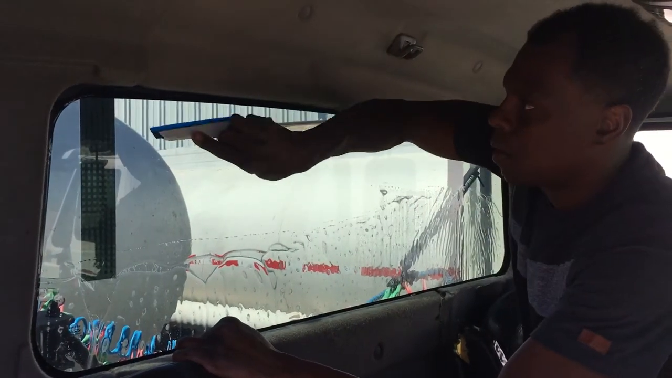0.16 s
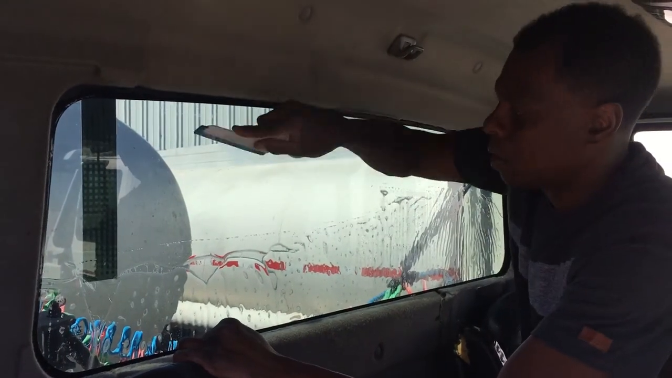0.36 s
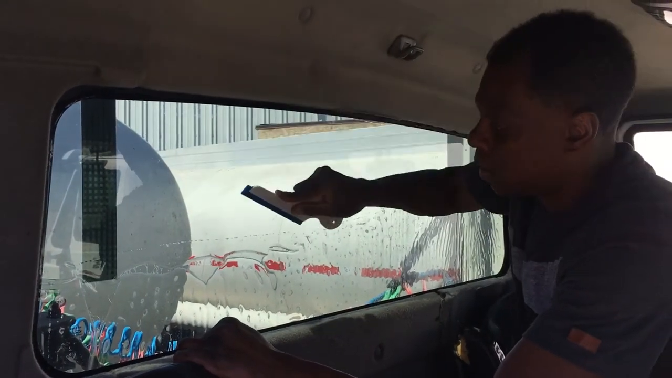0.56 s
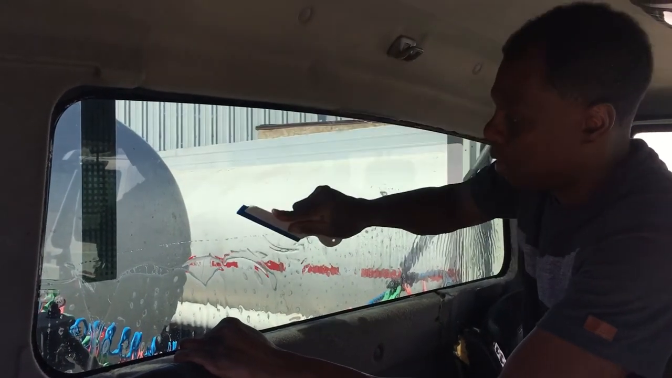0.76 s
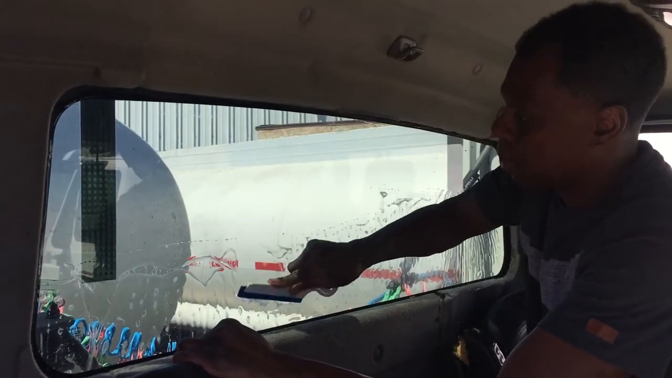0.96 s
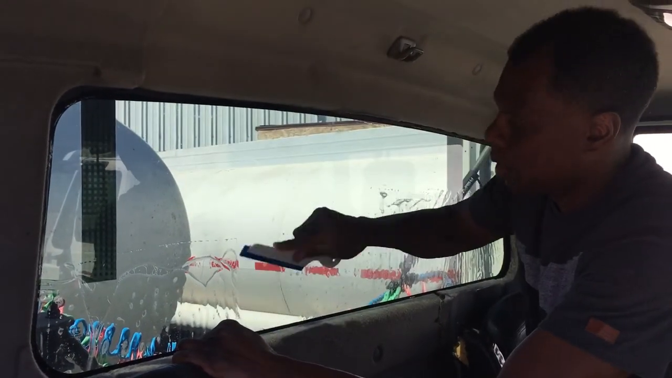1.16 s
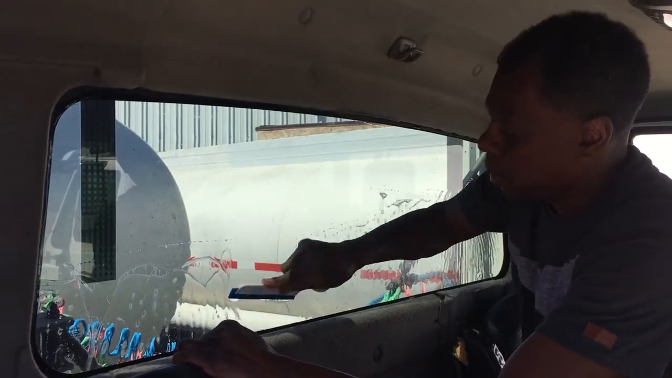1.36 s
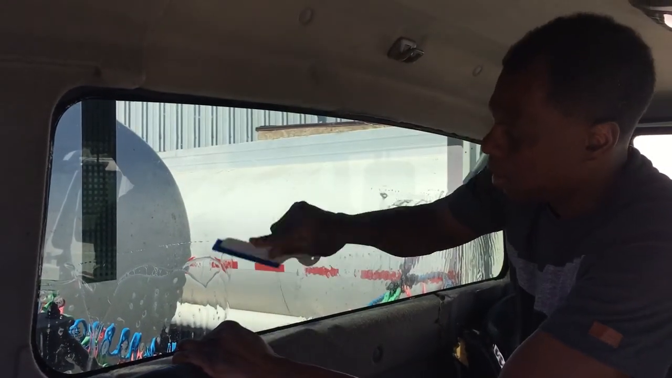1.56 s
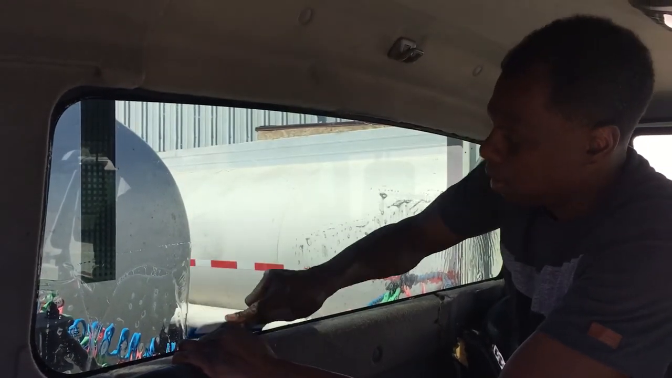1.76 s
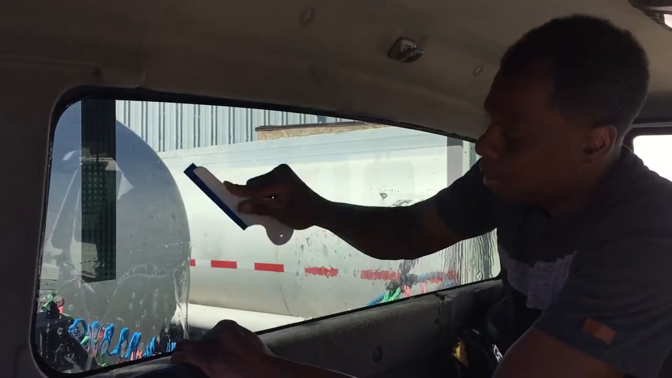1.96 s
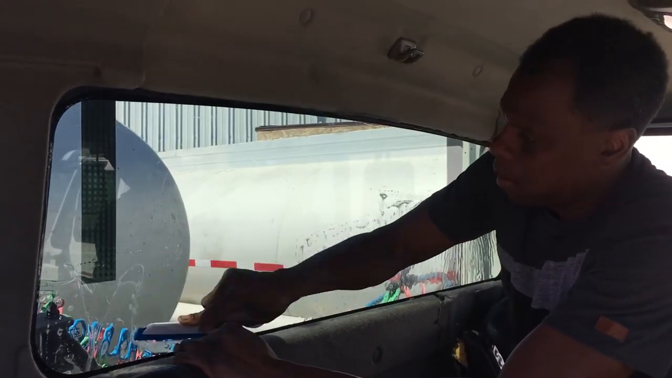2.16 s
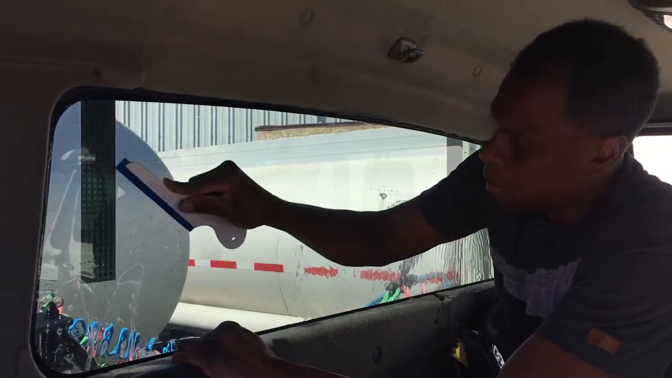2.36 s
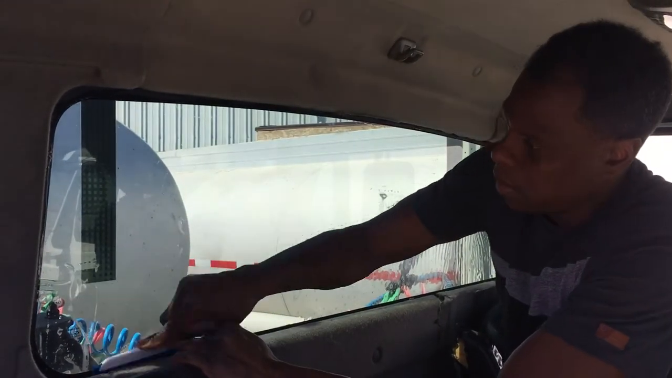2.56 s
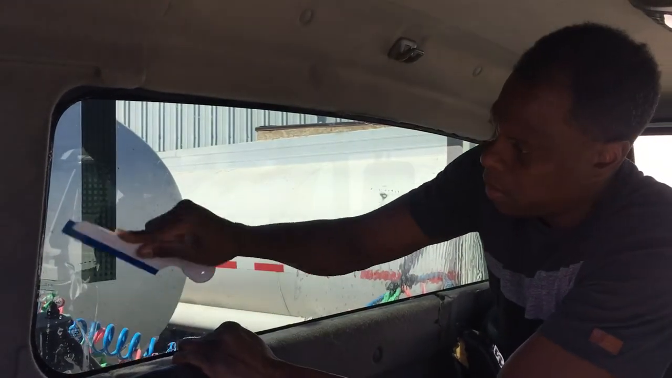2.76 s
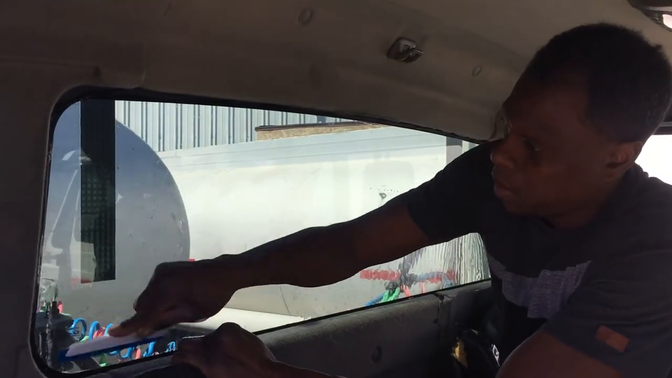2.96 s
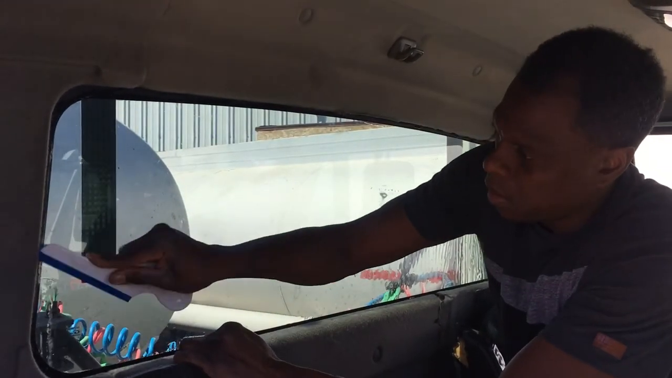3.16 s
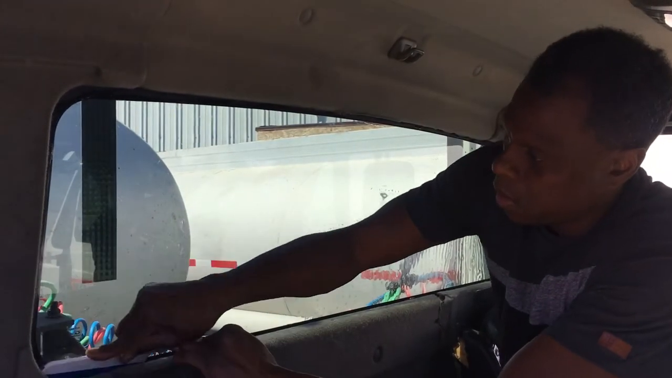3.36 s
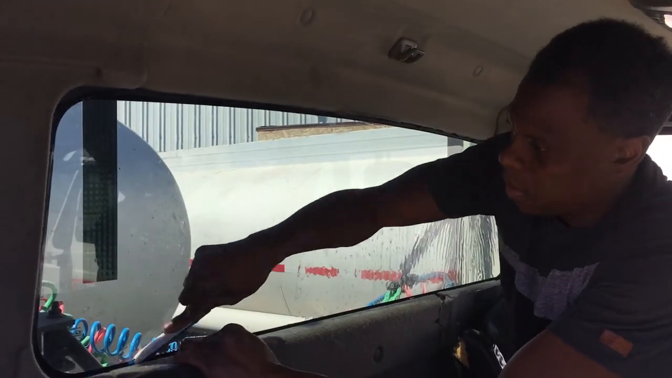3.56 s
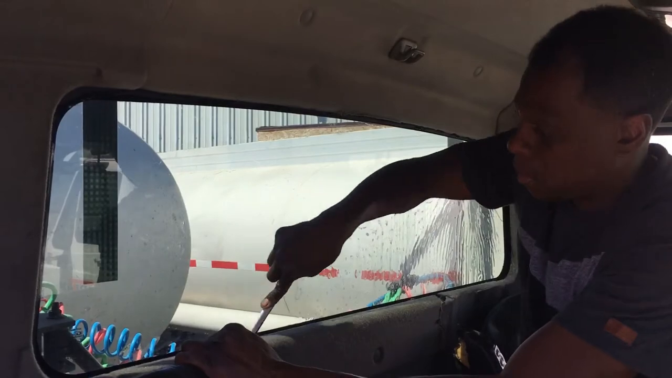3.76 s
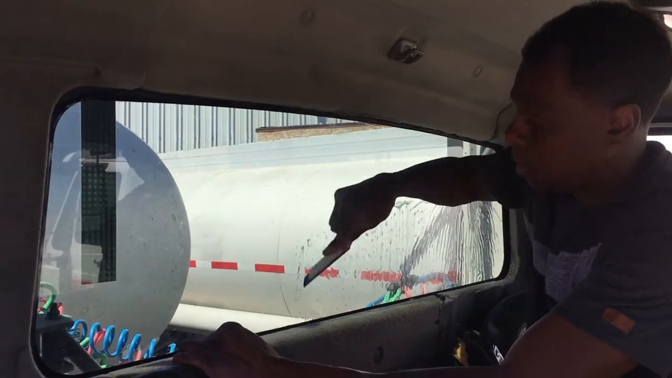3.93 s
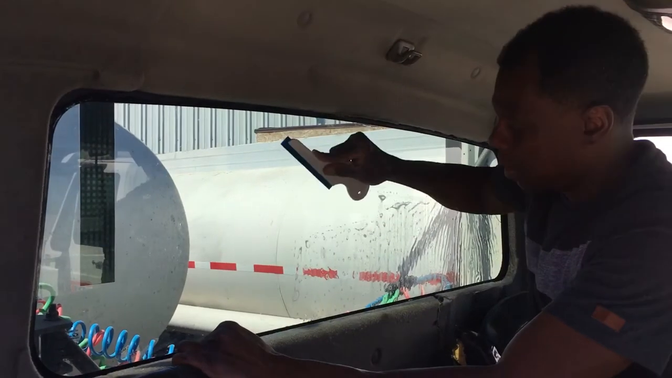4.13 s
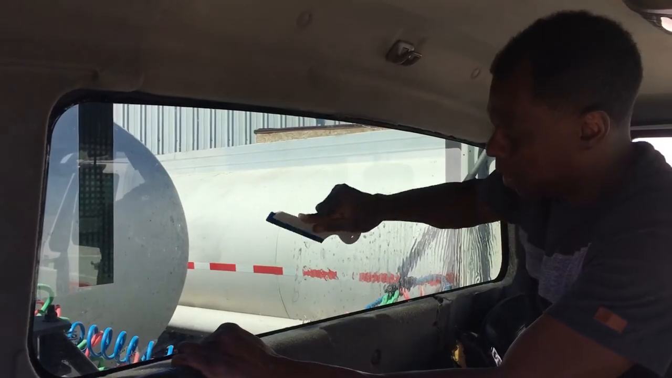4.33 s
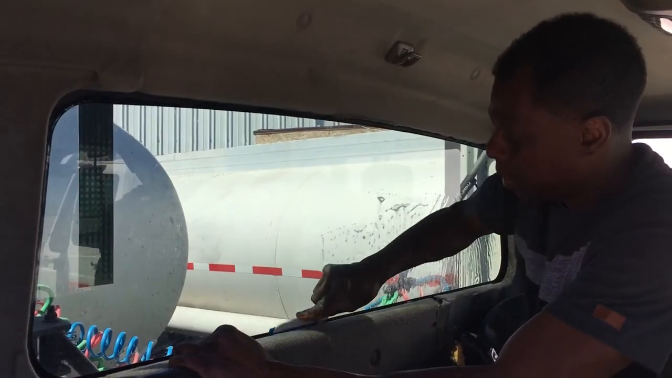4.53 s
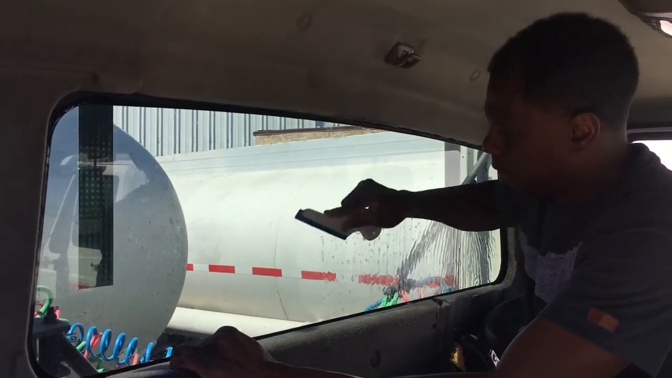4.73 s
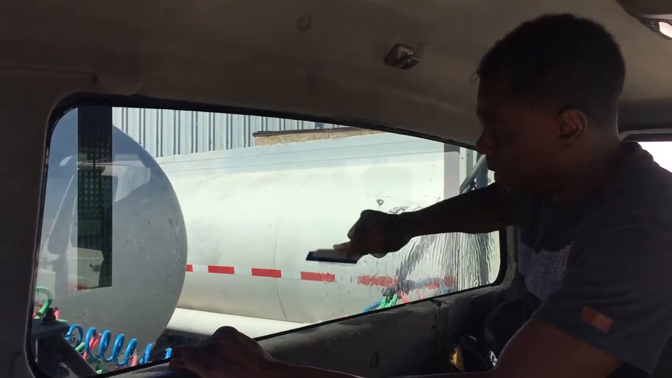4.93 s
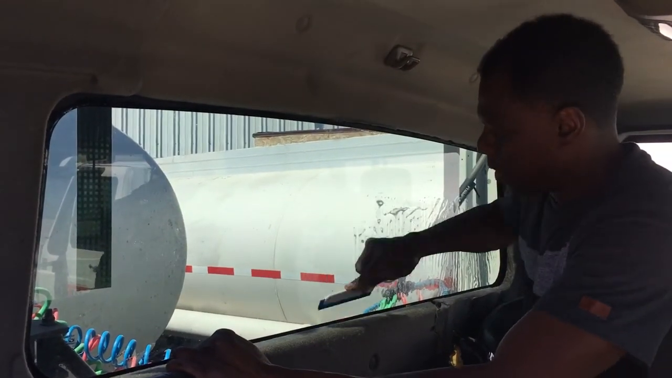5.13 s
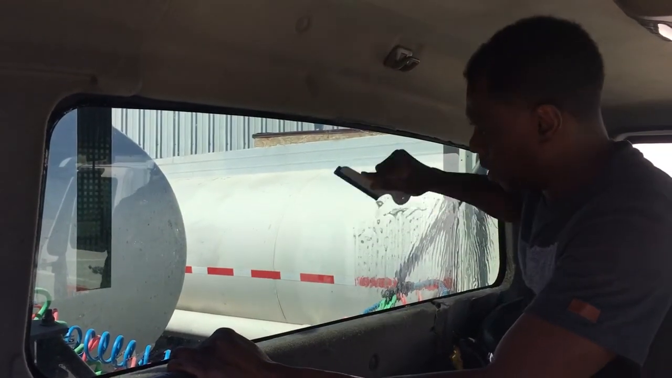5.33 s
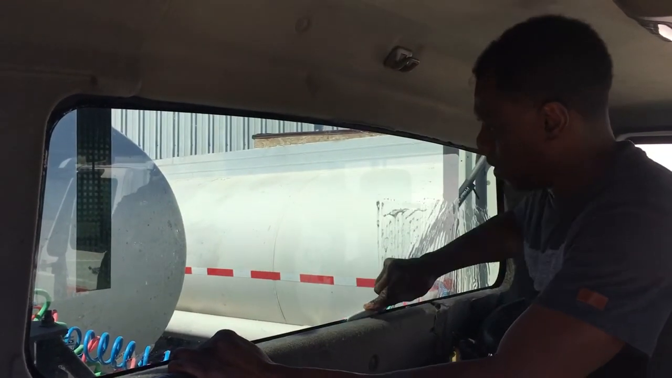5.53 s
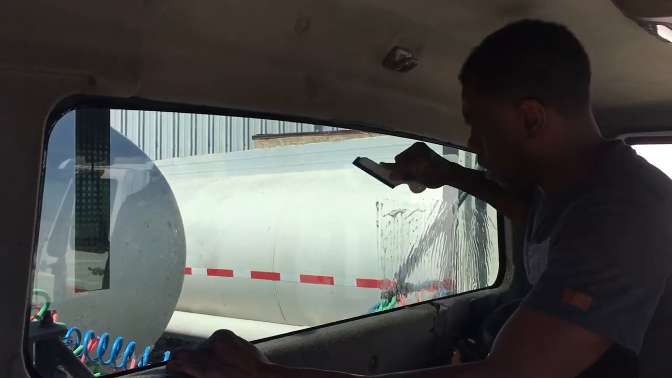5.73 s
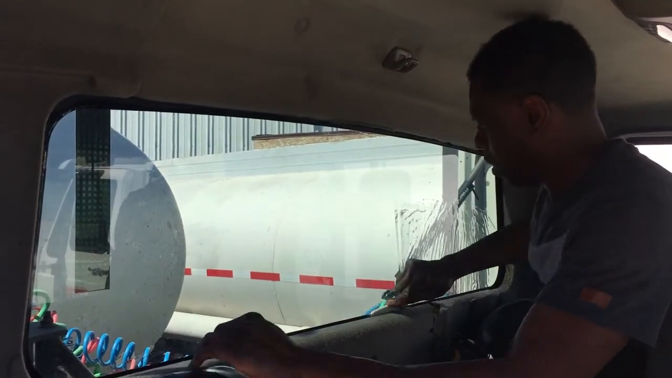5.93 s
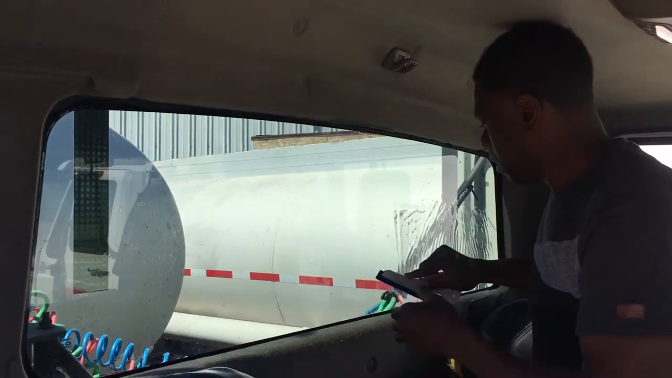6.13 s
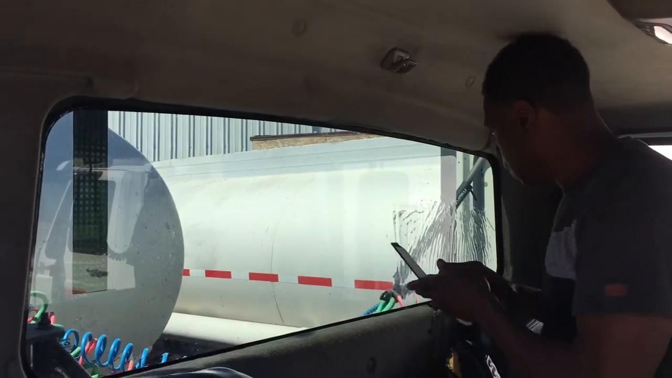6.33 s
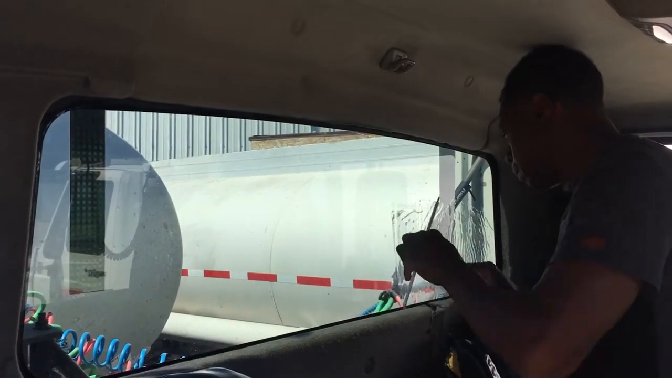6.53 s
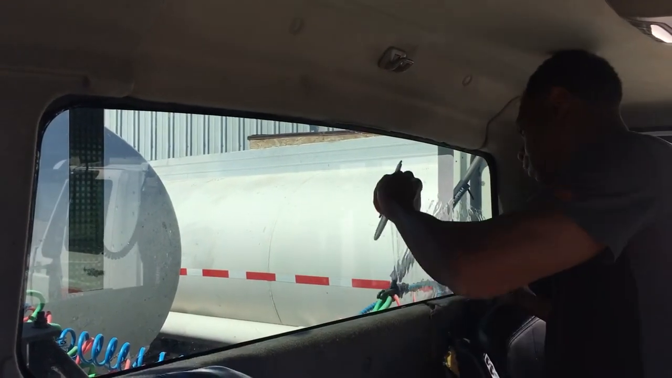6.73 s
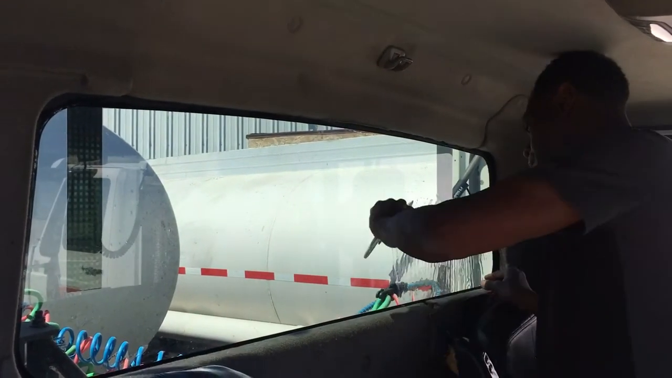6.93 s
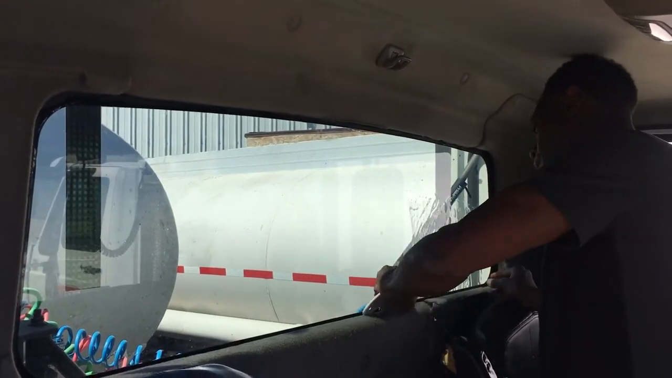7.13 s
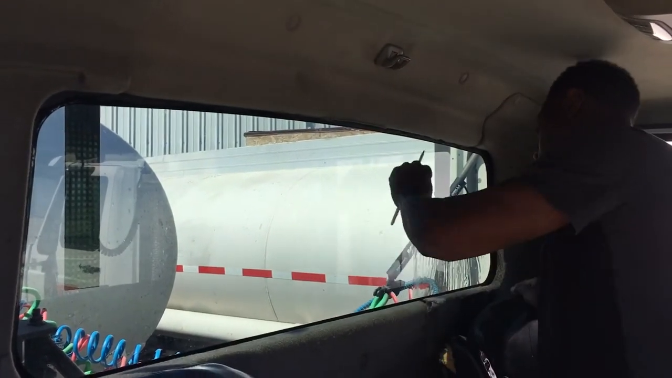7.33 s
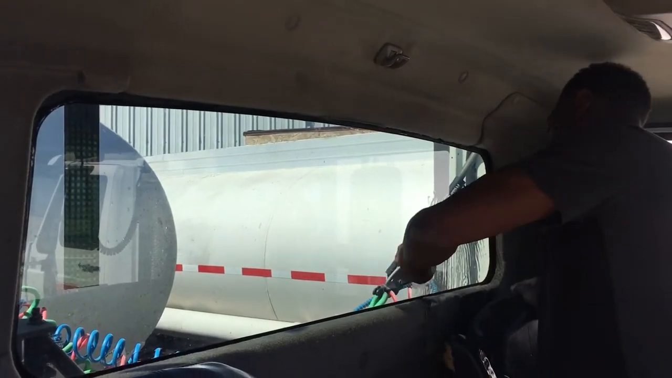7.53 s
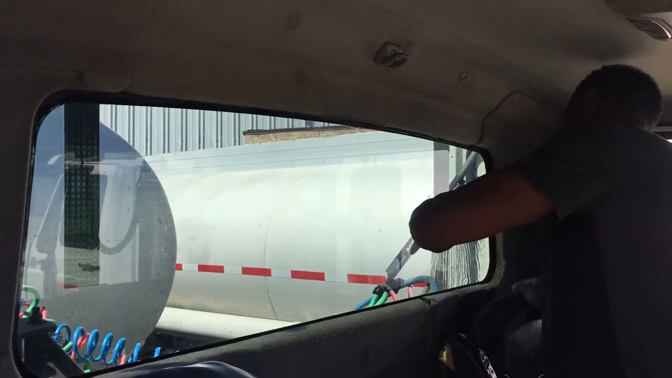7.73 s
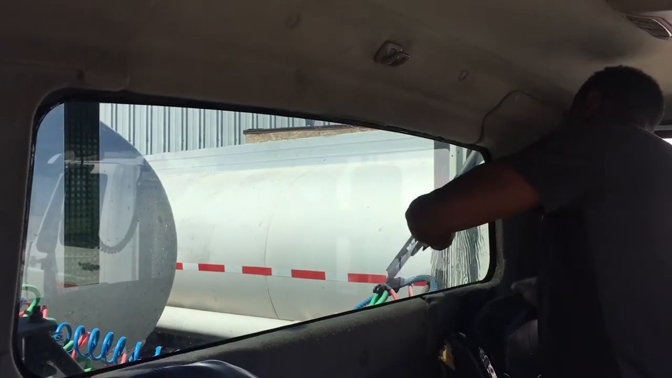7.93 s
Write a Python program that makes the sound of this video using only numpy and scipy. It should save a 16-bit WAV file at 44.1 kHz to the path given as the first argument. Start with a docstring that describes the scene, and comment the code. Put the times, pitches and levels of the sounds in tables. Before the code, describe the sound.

A hand squeegee works wet glass inside a vehicle cab: short hissing wipes, rubbery scrapes, dull knocks and one sharp plastic click over low rumble.

```python
"""Wet rubber hisses and squeaks across glass over low door rumble and a steady wash from the yard outside.
A hand squeegee works the side window of a truck cab: strokes are filtered grain noise with bubble pops.
Landings slap the pane and bumps hit the frame: noise bursts plus dying modes of handle, frame, pane and door.
The lip smacks off the film as short noise bursts; once the plastic handle snaps hard on the frame, a modal click."""
import sys
import numpy as np
from scipy import signal
from scipy.io import wavfile
from scipy.ndimage import uniform_filter1d

SR = 44100
rng = np.random.default_rng(int(sys.argv[2]) if len(sys.argv) > 2 else 0)


def digitize_waveform(pressure):
    """Quantize a signal to 16-bit integers and store it at the path in sys.argv[1].

    Rows of a 2-D input are taken as channels; values are limited to [-1, 1].
    """
    field = np.atleast_2d(pressure).T
    bounded = np.clip(field, -1, 1)
    quanta = np.round(bounded * 32767).astype(np.int16)
    wavfile.write(sys.argv[1], SR, quanta)


N = 352403
AGE = np.arange(SR * 2 // 5) / SR  # s since the onset of an event
USUAL_DB = -43  # blow or lean of usual force

# modes of the pane: freq_hz, level_db, t60_s
PANE_MODES = [(157, 0.5, 0.55), (196.2, 1, 0.48), (217.8, -1, 0.48), (238.1, -1, 0.51), (272.6, 0, 0.3),
              (322.8, -7, 0.56), (385, -7, 0.23)]
# modes of the window frame: freq_hz, level_db, t60_s
FRAME_MODES = [(375.5, -1.5, 0.33), (505.6, -6, 0.22), (574.3, -1.5, 0.15), (656, -0.5, .12),
               (718, -8.5, 0.2), (824, -15.5, 0.41), (1008, -4, 0.13)]
# spectrum of frame knock and judder: freq_hz, density_db_per_hz
KNOCK_SPECTRUM = [(260, -17), (330, 4), (390, 6), (450, 3.5), (585, -3), (660, -3.5), (770, -3.5),
                  (930, -2.5), (1300, -17)]
# spectrum of handle clack and rubber drag: freq_hz, density_db_per_hz
CLACK_SPECTRUM = [(600, -21.5), (900, -3), (1070, 1.5), (1350, 0), (1550, -1.5), (1800, -2), (2200, -3.5),
                  (2600, -10), (3600, -23), (6000, -21)]
# spectrum of film hiss: freq_hz, density_db_per_hz
HISS_SPECTRUM = [(1900, -21), (2800, -4.5), (3700, 2.5), (4600, 1), (5200, -3), (6100, -1), (7000, -0.5),
                 (8500, -57)]
# spectrum of fine spray: freq_hz, density_db_per_hz
SPRAY_SPECTRUM = [(5500, 1), (7200, -6.5), (8300, -0.5), (9700, -2), (10800, -12.5), (12000, -2.5),
                  (14000, -12), (16000, -12)]


def amp(db):
    """Decibels to gain."""
    return 10 ** (np.asarray(db) / 20)


def evened(x, span_s=None):
    """Scales to rms 1, over the first span_s if given."""
    head = x if span_s is None else x[:int(span_s * SR)]
    return x / np.sqrt(np.mean(head ** 2) + 1e-20)


def steadied(x, span_s):
    """Holds a noise near rms 1 from moment to moment."""
    power = abs(uniform_filter1d(x ** 2, max(int(span_s * SR), 2)))
    return x / np.sqrt(power + 1e-12)


def add(mix, start_s, sound):
    """Mixes a sound in at start_s."""
    part = mix[max(round(start_s * SR), 0):][:len(sound)]
    part += sound[:len(part)]


def colour(x, spectrum, size=4096):
    """Minimum-phase filter, log-frequency interpolation between spectrum points."""
    hz, db = np.transpose(spectrum)
    f = abs(np.fft.fftfreq(size, 1 / SR))
    gain_db = np.interp(np.log(f + 1), np.log(hz), db, left=min(db[0], -20), right=-65)
    log_gain = np.log(amp(gain_db))
    taps = np.fft.ifft(np.exp(np.conj(signal.hilbert(log_gain)))).real
    return signal.fftconvolve(x, taps[:size // 2])[:len(x)]


def grains(count, per_s, spread_db):
    """Random train of tiny clicks of unequal size, rms 1."""
    size_db = spread_db * np.minimum(rng.exponential(1, count), 4)
    struck = rng.random(count) < per_s / SR
    return evened(rng.standard_normal(count) * amp(size_db) * struck)


def wander(hz):
    """Random drift of rms 1, low-passed at hz."""
    lowpass = signal.butter(2, hz, fs=SR, output="sos")
    return evened(signal.sosfilt(lowpass, rng.standard_normal(N)))


def swell(rise_s):
    """Opens from 0 towards 1, 63% at rise_s."""
    return 1 - np.exp(-(AGE / max(rise_s, 1e-5)) ** 2)


def ring(modes, scatter_db, detune):
    """Dying modes; share, pitch and phase vary at random from blow to blow."""
    hz, db, t60_s = np.transpose(modes)[:, :, None]
    share, shift, phase = rng.standard_normal((3, len(modes), 1))
    envelope = amp(db + scatter_db * share - 60 * AGE / t60_s)
    cycles = hz * (1 + detune * shift) * AGE + phase
    return (envelope * np.sin(2 * np.pi * cycles)).sum(0)


def echo(t60_s):
    """Dense reflections in the cab: the trim soaks up treble first; t60_s holds at 1 kHz."""
    hz, t, z = signal.stft(rng.standard_normal(len(AGE)), SR, nperseg=256)
    band_t60_s = t60_s * (np.maximum(hz, 400)[:, None] / 1000) ** -.4
    return signal.istft(z * amp(-60 * t / band_t60_s), SR, nperseg=256)[1][:len(AGE)]


def burst(spectrum, rise_s, t60_s, tail_db, tail_t60_s):
    """Cluster of tiny contacts with the short echo of the cab."""
    contact = steadied(grains(len(AGE), 12000, 8.9), 0.0044) * amp(-60 * AGE / t60_s)
    return colour((contact + amp(tail_db) * echo(tail_t60_s)) * swell(rise_s), spectrum)


def rumble(count):
    """The door shuddering under the hand: low noise held near rms 1."""
    # freq_hz, density_db_per_hz
    door_spectrum = [(12, -22.5), (27, -1.5), (40, 0.5), (55, 3), (70, 1), (83, 5), (105, 0), (135, -8),
                     (200, -29.5)]
    return steadied(colour(rng.standard_normal(count), door_spectrum, size=32768), 0.17)


def cab():
    """Door and pane rumble as the hand leans on them, over the wash of the yard outside."""
    # hand leaning on the window: time_s, level_db
    lean_points = [(0.0, -43.5), (0.93, -38), (1.27, -38.5), (1.44, -40), (1.76, -43), (2.02, -34.5),
                   (2.74, -38), (3.29, -38), (4.94, -45.5), (5.21, -42.5), (5.74, -41), (6.25, -52),
                   (7.14, -46), (7.32, -34), (7.54, -45.5), (7.99, -42.5)]
    # drone of the pane: freq_hz, density_db_per_hz
    drone_spectrum = [(90, -16), (140, 1.5), (175, 0.5), (210, 1.5), (270, -2.5), (330, -5), (420, -13),
                      (600, -18), (900, -18), (1500, -27)]
    # wash of the yard: freq_hz, density_db_per_hz
    yard_spectrum = [(120, -35.5), (200, -3.5), (254, -4), (473, -28.5), (647, -15), (683, -19),
                     (883, -23.5), (950, -21), (1370, -21), (1500, -19), (2170, -26), (2510, -32.5),
                     (6400, -40), (14300, -44.5), (16000, -49)]
    lean_gain_db = 2  # overall strength of the lean on the door
    waver_db, waver_hz = 1.5, 15.7  # unsteadiness of the hand
    drone_db, drone_slope = -49.5, 0.31  # at usual lean; dB per dB of lean
    yard_db = -58
    lean_db = np.interp(np.arange(N) / SR, *np.transpose(lean_points))
    door = rumble(N) * amp(lean_db + lean_gain_db + waver_db * wander(waver_hz))
    drone = steadied(colour(rng.standard_normal(N), drone_spectrum), 0.16)
    pane = drone * amp(drone_db + drone_slope * (lean_db - USUAL_DB))
    wash = evened(colour(rng.standard_normal(N), yard_spectrum))
    return door + pane + amp(yard_db + 0.33 * wander(3.6)) * wash


def bubbles():
    """Tiny soap bubbles bursting at the lip, each a few cycles at its own pitch."""
    pops = np.zeros(N)
    age_s = AGE[:SR // 200]
    when, pitch, size = rng.random(size=(5000, 3)).T[:, :, None]
    cycles = 2800 * 4 ** pitch * age_s  # 2.8-11.2 kHz
    pop = amp(14 * size ** 2) * np.sin(2 * np.pi * cycles) * np.exp(-cycles / 6)
    start = (when * (N - len(age_s))).astype(int)
    np.add.at(pops, start + np.arange(len(age_s)), pop)
    return evened(pops)


def wipes():
    """Soapy water fizzes out from under the sliding blade while the rubber drags on the film."""
    # strokes: fastest_s, speeding_up_s, slowing_down_s, hiss_db, film_dryness (0-1)
    strokes = [(0.005, 0.043, 0.065, -52.5, 0.54), (0.233, 0.045, 0.055, -72, 1),
               (.58, 0.067, 0.072, -70, 1), (1.03, 0.1, 0.11, -57.5, 0), (1.392, 0.085, 0.097, -57.5, 0.23),
               (1.79, 0.064, 0.11, -53, 0.07), (2.155, 0.088, 0.077, -57.5, 0.05),
               (2.49, 0.055, 0.12, -54.5, 0.1), (2.875, .1, 0.061, -54, 0.11), (3.29, 0.14, .04, -55, 0),
               (3.6, .08, 0.037, -66.5, 0.4), (3.82, 0.22, .1, -60, 0), (4.22, 0.054, 0.41, -77, 1),
               (4.41, 0.085, 0.3, -62.5, 0.36), (5.017, 0.16, 0.14, -63.5, 0.1),
               (5.15, 0.06, 0.049, -64.5, .55), (5.518, 0.15, 0.11, -62.5, 0.08),
               (5.93, 0.11, 0.15, -58.5, 0.25), (6.255, 0.13, 0.12, -63.5, 0.02),
               (6.6, 0.38, 0.4, -71, 0.28), (7.0, 0.35, 0.94, -70, 0.08), (7.215, 0.038, 0.017, -60, 0.73),
               (7.58, 0.079, 0.15, -59, 0.26), (7.96, 0.073, 0.13, -68, 0.23)]
    # hiss, spray, drag, judder: levels relative to the hiss on wet and on dry film
    wet_db = np.array([0, -1, -2.5, -6.5])
    dry_db = np.array([0, -21.5, 16.5, 23])
    judder_depth_db, flutter_db, grain_db = 3.5, 1.7, 2.2
    level, t = np.zeros((4, N)), np.arange(N) / SR
    for fastest_s, speeding_s, slowing_s, hiss_db, dryness in strokes:
        # the hand speeds up and slows down: a bell of level
        away = abs(t - fastest_s) / np.where(t < fastest_s, speeding_s, slowing_s)
        bell = np.exp(-2.1 * np.minimum(away, 4) ** 1.65)
        mix_db = hiss_db + wet_db + np.clip(dryness, 0, 1) * (dry_db - wet_db)
        level += amp(mix_db)[:, None] * bell
    hiss = evened(colour(grains(N, 9000, grain_db), HISS_SPECTRUM))
    fizz = evened(hiss + amp(-5) * bubbles()) * amp(1.2 * wander(30))
    spray = evened(colour(grains(N, 8000, grain_db), SPRAY_SPECTRUM))
    drag = evened(colour(grains(N, 3000, 1.0), CLACK_SPECTRUM)) * amp(0.53 * wander(25))
    # the drag stutters and shakes the frame
    shaking = colour(grains(N, 4200, 0.96), KNOCK_SPECTRUM)
    judder = evened(shaking * amp(judder_depth_db * wander(45)))
    # uneven wetness makes the grip flutter
    return amp(flutter_db * wander(53.2)) * (level * [fizz, spray, drag, judder]).sum(0)


def catches():
    """Rough stick-slip of rubber on drier film: a flurry of slips rings the blade and one overtone."""
    # start_s, decay_s, pitch_hz, level_db
    catch_events = [(0.012, 0.009, 2080, -42), (3.979, 0.015, 1930, -54.5), (4.205, 0.025, 1190, -54.5),
                    (5.287, 0.01, 2280, -62), (6.214, 0.025, 2000, -57), (6.272, 0.0068, 2270, -56),
                    (6.836, .021, 1060, -48.5), (6.88, 0.0017, 2870, -46.5), (6.881, 0.018, 1160, -50.5),
                    (7.335, 0.0024, 3200, -59), (7.364, 0.011, 2250, -54), (7.563, 0.0075, 2590, -48.5)]
    out = np.zeros(N)
    for start_s, decay_s, hz, db in catch_events:
        blade_modes = [(hz, 0, .007), (hz * 2.9, -9, .002)]
        blade = (ring(blade_modes, 0, 0) * swell(.0003))[:SR // 100]
        slips = signal.fftconvolve(grains(len(AGE), 6100, 0.93), blade)[:len(AGE)]
        envelope = swell(decay_s / 5) * np.exp(-AGE / decay_s)
        add(out, start_s, amp(db) * evened(steadied(slips, 0.0075) * envelope, 2 * decay_s))
    return out


def rocking(soft_s):
    """The door swinging in its lowest modes."""
    # freq_hz, level_db, t60_s
    door_modes = [(38.3, -17, 0.58), (54.3, -4.5, 0.36), (66.8, -16, 0.76), (81.5, -3.5, 0.43),
                  (105, -7, 0.21), (123.7, -15.5, 0.6)]
    return evened(ring(door_modes, scatter_db=1.5, detune=0.041) * swell(soft_s + 0.019), 0.093)


def thumps():
    """Soft low thumps, no contact noise: the door rocks as the hand shifts its weight."""
    # start_s, level_db
    thump_events = [(0.025, -38.5), (0.219, -31.5), (1.06, -26), (1.842, -29), (4.6, -37), (5.139, -33.5),
                    (5.559, -32), (6.56, -44), (6.919, -46), (7.42, -34.5)]
    out = np.zeros(N)
    for start_s, db in thump_events:
        add(out, start_s, amp(db) * rocking(0))
    return out


def blow(force_db, slap_db, boom_db, knock_db, thud_db, usual_soft_s, handle_hz, pane_hz, lag_s, clatter_t60_s):
    """The slap opens first, then handle and frame; the heavy pane and door swing up last."""
    # wet slap: freq_hz, density_db_per_hz
    slap_spectrum = [(2000, -21), (2850, -9), (3400, 4.5), (4000, 2), (4600, -1), (5200, -5), (6000, -0.5),
                     (7400, -10.5), (8300, -7.5), (10000, -14), (11000, -17.5), (16000, -28)]
    soft_slope = 0.67  # dB per dB: a harder shove makes a shorter contact
    ring_db, ring_slope = -1, 0.59  # at usual force; dB per dB: more force rings the handle more
    overtone_ratio, overtone_db = 1.22, -7  # second mode of the handle
    frame_mix_db = -1  # frame ringing above its rattle
    sway_db, sway_s = -6, 0.1  # sway against rocking; time factor of its swell
    soft_s = usual_soft_s * amp(-soft_slope * (knock_db - USUAL_DB))
    slap = evened(burst(slap_spectrum, soft_s, t60_s=0.06, tail_db=-13.5, tail_t60_s=0.23), 0.027)

    handle_modes = [(handle_hz, 0, .03), (handle_hz * overtone_ratio, overtone_db, .03)]
    handle = evened(ring(handle_modes, 0, 0) * swell(soft_s + 0.00078), 0.016)
    clatter = evened(burst(CLACK_SPECTRUM, soft_s + 0.00078, t60_s=clatter_t60_s, tail_db=-4.0,
                           tail_t60_s=2.12 * clatter_t60_s), 0.088)
    clack = evened(clatter + amp(ring_db + ring_slope * (force_db - USUAL_DB)) * handle, 0.048)

    frame = evened(ring(FRAME_MODES, scatter_db=6.5, detune=0.0042) * swell(soft_s + 0.0028), 0.057)
    rattle = evened(burst(KNOCK_SPECTRUM, soft_s + 0.013, t60_s=0.13, tail_db=-10.5, tail_t60_s=0.34), 0.031)
    knock = evened(rattle + amp(frame_mix_db) * frame, 0.029)

    # the spot that is hit favours one bending mode of the pane
    favoured = evened(ring([(pane_hz, 0, .15)], 0, 0.0027) * swell(lag_s) ** 2, 0.077)
    pane = evened(ring(PANE_MODES, scatter_db=2.0, detune=0.02) * swell(soft_s + 0.0072), 0.11)
    boom = evened(favoured + amp(-1.5) * pane, 0.06)

    # door rumble that swells and dies away
    sway = rumble(len(AGE)) * AGE / sway_s * np.exp(1 - AGE / sway_s) * (1 - AGE / AGE[-1])
    thud = rocking(soft_s) + amp(sway_db) * sway
    return (amp(slap_db) * slap + amp(force_db) * clack + amp(knock_db) * knock
            + amp(boom_db) * boom + amp(thud_db) * thud)


def blows():
    """The blade lands flat with a wet slap; against the frame it bumps more dully."""
    # blade on the pane: start_s, force_db, slap_db, boom_db, shove_db, pane_hz, handle_hz
    landing_events = [(0.134, -33, -42, -33, -38, 213.7, 1804),
                      (0.483, -39, -42.5, -29, -44.5, 192.5, 1380),
                      (0.813, -35, -40, -31.5, -29, 198.4, 2050),
                      (1.268, -47, -42.5, -34.5, -50, 205, 1840),
                      (1.657, -43.5, -46, -34.5, -54, 204, 1915),
                      (1.823, -36, -37.5, -37, -40.5, 211, 1380),
                      (2.038, -33.5, -40.5, -26, -40.5, 197, 2230),
                      (2.389, -46, -48.5, -35, -48.5, 187, 1900),
                      (2.736, -49, -51.5, -38, -47.5, 185.5, 1930),
                      (4.118, -45.5, -48, -31, -46.5, 178, 1410),
                      (4.859, -44.5, -43.5, -35, -50.5, 188, 1760),
                      (5.336, -35.5, -38, -28.5, -35, 204, 1080), (5.776, -40, -42, -35, -48.5, 231, 978),
                      (7.0969, -29.5, -43, -29, -35.5, 294, 1290),
                      (7.3964, -48.5, -50.5, -38, -50, 223, 870),
                      (7.857, -41.5, -40.5, -27, -32, 188, 1100)]
    # blade on the frame at the end of a stroke: start_s, force_db, slap_db, boom_db, pane_hz
    bump_events = [(0.681, -50, -77, -40.5, 201), (1.058, -47.5, -58, -38, 214),
                   (2.903, -51.5, -72, -32, 305), (3.305, -37.5, -66, -30, 301.4),
                   (3.692, -52, -58.5, -55, 167), (4.572, -47, -51.5, -42.5, 154),
                   (5.052, -47, -49.5, -44, 164), (5.515, -49, -51.5, -39, 230)]
    # door thud at usual shove or boom; slope in dB per dB
    landing_thud_db, landing_thud_slope = -36.5, 0.68
    bump_thud_db, bump_thud_slope = -35, 0.66
    bump_knock_db = 2  # frame knock above force
    out = np.zeros(N)
    for start_s, force_db, slap_db, boom_db, shove_db, pane_hz, handle_hz in landing_events:
        thud_db = landing_thud_db + landing_thud_slope * (shove_db - USUAL_DB)
        add(out, start_s, blow(force_db, slap_db, boom_db, shove_db, thud_db, usual_soft_s=0.00095,
                               handle_hz=handle_hz, pane_hz=pane_hz, lag_s=0.018, clatter_t60_s=0.094))
    for start_s, force_db, slap_db, boom_db, pane_hz in bump_events:
        thud_db = bump_thud_db + bump_thud_slope * (boom_db - USUAL_DB)
        # against the frame the clatter dies a little sooner
        add(out, start_s, blow(force_db, slap_db, boom_db, force_db + bump_knock_db, thud_db, usual_soft_s=.0012,
                               handle_hz=1331, pane_hz=pane_hz, lag_s=0.0054, clatter_t60_s=0.079))
    return out


def smacks():
    """The lip of the blade lets go of the wet film; brightness tips the balance from clack to spray."""
    # start_s, level_db, brightness_db (raises spray and lowers clack by this much)
    smack_events = [(0.35, -68, -8.5), (0.853, -59, -3), (1.48, -54.5, -7.5), (2.003, -66.5, -5),
                    (2.839, -60.5, 2), (3.0952, -63.5, -13), (3.215, -65, -7), (3.531, -68, -4),
                    (3.868, -60.5, -1.5), (4.025, -56, -2), (4.054, -55.5, -4.5), (4.728, -73.5, -12),
                    (4.966, -59.5, 3), (5.229, -71, -8), (5.579, -55.5, -3.5), (5.931, -53.5, -5),
                    (5.999, -59, -2.5), (6.235, -64.5, -0.5), (6.615, -56, -1), (7.118, -61.5, 1),
                    (7.617, -50, -7)]
    # clack_db, hiss_db, spray_db
    mix_levels = (-2, 0, 5.5)
    spectra = (CLACK_SPECTRUM, HISS_SPECTRUM, SPRAY_SPECTRUM)
    out = np.zeros(N)
    for start_s, db, bright_db in smack_events:
        for spectrum, mix_db, tilt_db in zip(spectra, mix_levels, (-bright_db, 0, bright_db)):
            layer = evened(burst(spectrum, 0.0005, t60_s=0.082, tail_db=-4.5, tail_t60_s=0.17), .02)
            add(out, start_s, amp(db + mix_db + tilt_db) * layer)
    return out


def snap():
    """One stiff plastic click of the handle, thrown back by the close walls of the cab."""
    # start_s, level_db
    snap_s, snap_db = (3.4318, -20.5)
    # handle modes: freq_hz, level_db, t60_s
    handle_modes = [(1484, -8, 0.013), (1790, -2, 0.021), (1840, -18.5, 0.11), (2280, -12.5, .025),
                    (3700, -3, 0.0051), (4570, -2, 0.012), (5830, -3, 0.0062), (8240, -6, 0.0055),
                    (9900, -7, .006), (12040, -12.5, 0.006)]
    # crack: freq_hz, density_db_per_hz
    crack_spectrum = [(500, -28), (1000, -3.5), (1850, -2), (2200, -5.5), (2700, -6.5), (3700, -7.5),
                      (4600, -5.5), (5200, -3), (6000, -11), (7200, -8.5), (9800, -19), (12000, -16.5),
                      (16000, -26)]
    echo_db, echo_t60_s = -14.5, 0.15
    click = evened(ring(handle_modes, scatter_db=3.0, detune=.002) * swell(0.00072), 0.047)
    crack = evened(burst(crack_spectrum, 0.00046, t60_s=0.0076, tail_db=-15, tail_t60_s=0.15), 0.041)
    walls = evened(colour(echo(echo_t60_s) * swell(0.0087), crack_spectrum), 0.034)
    # the window answers
    window = evened(ring(FRAME_MODES + PANE_MODES, scatter_db=5.5, detune=0.0037) * swell(.008), 0.045)
    impact = evened(click + amp(-7.5) * crack, 0.016)
    out = np.zeros(N)
    add(out, snap_s, amp(snap_db) * (impact + amp(echo_db) * walls + amp(-16.5) * window))
    return out


def scene():
    """Sum of all sources, one channel."""
    return (cab() + wipes() + catches() + thumps() + blows() + smacks() + snap())[None]


def record(dry):
    """Linear-phase low-pass: the band limit of the recorder."""
    edge_hz = 16200
    taps = signal.firwin(511, edge_hz, window=("kaiser", 9), fs=SR)
    return signal.oaconvolve(dry, taps[None], "same")


dry = scene()
out = record(dry)
digitize_waveform(out)
```